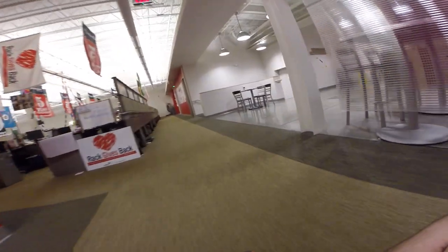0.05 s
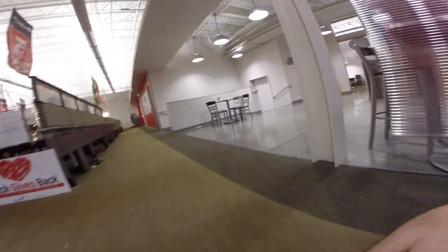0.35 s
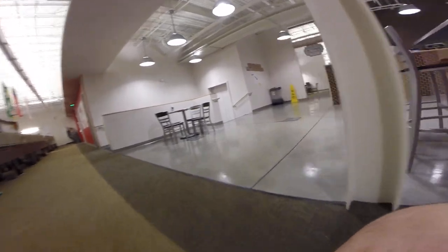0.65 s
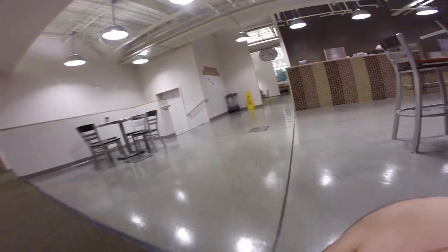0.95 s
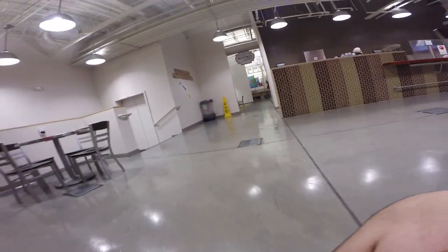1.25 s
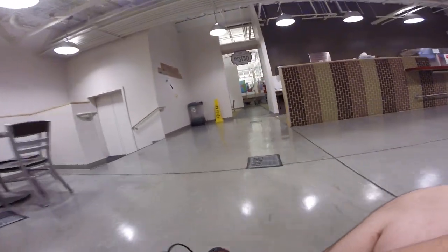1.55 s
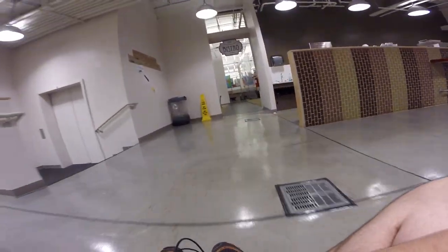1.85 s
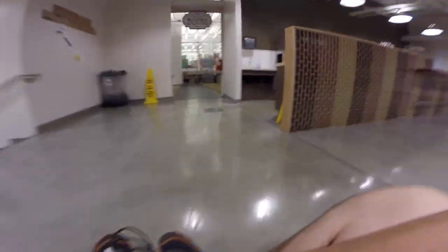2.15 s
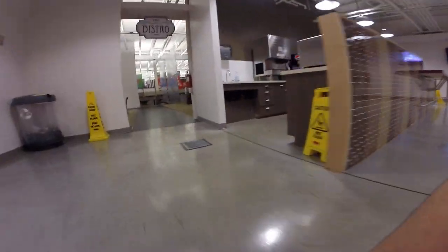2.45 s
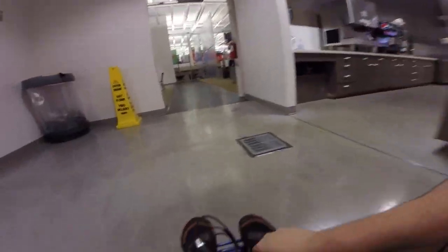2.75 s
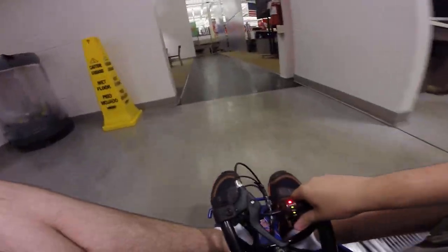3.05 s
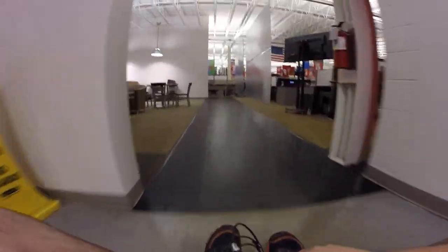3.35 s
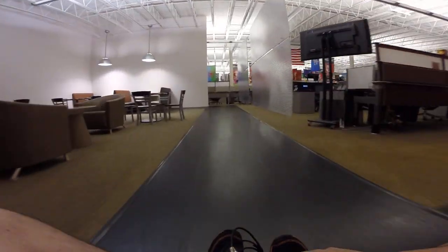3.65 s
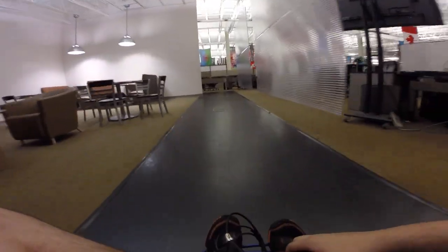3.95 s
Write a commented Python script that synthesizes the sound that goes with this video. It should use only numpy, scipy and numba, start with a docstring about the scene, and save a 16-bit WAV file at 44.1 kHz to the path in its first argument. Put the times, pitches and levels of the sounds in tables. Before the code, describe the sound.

Electric go-cart wheels rumble from carpet onto concrete, with drive hum and rattling bumps.

```python
"""A small electric go-cart, heard from its seat, rolls from carpet onto polished concrete and back.
Floor grain booms in the hard wheels, which throb as they turn; the drive hums and its chain whirrs.
Seams thump the wheels, knock the chassis and rattle the frame.
The hall adds a short tail; a limiter holds the peaks down."""
import sys
import numpy as np
from scipy import signal
from scipy.fft import rfft, irfft
from scipy.io import wavfile
from scipy.ndimage import uniform_filter1d, minimum_filter1d
from numba import njit

SR = 44100
rng = np.random.default_rng(int(sys.argv[2]) if len(sys.argv) > 2 else 0)


def wrap_up_sound(samples):
    """Save the sound to the file named by the first command line argument, as 16-bit audio."""
    columns = np.atleast_2d(samples).T
    # keep every value between -1 and 1, then stretch to whole-number steps
    tamed = np.clip(columns, -1, 1)
    steps = np.round(tamed * 32767).astype(np.int16)
    wavfile.write(sys.argv[1], SR, steps)


N = 4 * SR


def undb(db):
    """Decibels to gain."""
    return 10 ** (np.asarray(db) / 20)


def unit(x):
    """Scale to rms 1."""
    return x / np.sqrt(np.mean(x ** 2))


def curve(table, column=1):
    """One table column, linear in time."""
    rows = np.array(table, float)
    return np.interp(np.arange(N) / SR, rows[:, 0], rows[:, column])


def colour(x, spectrum):
    """Minimum-phase filter through (frequency [Hz], level [dB]) points; rms 1."""
    hz, db = np.array(spectrum, float).T
    bins_hz = np.maximum(np.arange(N // 2 + 1) * SR / N, 1)
    gain = undb(np.interp(np.log(bins_hz), np.log(hz), db))
    cepstrum = irfft(np.log(gain), N)
    cepstrum[1:N // 2] *= 2
    cepstrum[N // 2 + 1:] = 0
    return unit(irfft(rfft(x) * np.exp(rfft(cepstrum)), N))


@njit
def bandpass(x, hz, width_hz):
    """State-variable band-pass with a moving centre."""
    y, band_state, low_state = np.empty(len(x)), 0., 0.
    for i in range(len(x)):
        g, damping = np.tan(np.pi * hz[i] / SR), width_hz / hz[i]
        band = (band_state + g * (x[i] - low_state)) / (1 + g * (g + damping))
        band_state = 2 * band - band_state
        low_state += 2 * g * band
        y[i] = damping * band
    return y


def drift(rate_hz):
    """Smooth random drift; rms 1."""
    span = int(SR / rate_hz)
    return unit(uniform_filter1d(uniform_filter1d(rng.standard_normal(N), span), span))


def grains(per_s, spread_db):
    """Random tiny impacts of uneven size; rms 1."""
    size = undb(spread_db * np.clip(rng.standard_normal(N), -2, 2))
    sign = np.sign(rng.standard_normal(N))
    return unit(size * sign * (rng.random(N) < per_s / SR))


def burst(start_s, hold_s, rise_s, decay_s):
    """Rise, hold and exponential release."""
    t = np.arange(N) / SR - start_s
    return np.clip(t / rise_s + .5, 0, 1) * np.exp(-np.maximum(t - hold_s, 0) / decay_s)


def sine(hz):
    """Sine with a moving pitch."""
    return np.sin(2 * np.pi * np.cumsum(hz) / SR)


def hall(x, t60_s=0.56):
    """The hall returns a diffuse tail, mostly middle and treble."""
    tail = rng.standard_normal(N) * burst(0.0023, 0, rise_s=0.015, decay_s=t60_s / np.log(1000))
    wet = signal.fftconvolve(x, tail / np.sqrt(np.sum(tail ** 2)))[:N]
    return signal.sosfilt(signal.butter(2, [500, 6000], "band", fs=SR, output="sos"), wet)


# tread spectrum (frequency [Hz], level [dB])
HISS_SPECTRUM = [(3000, 11), (6000, 2), (7200, 1), (8400, 4.5), (10500, 0), (12200, 2.5), (14000, -19)]
# tread hiss (time [s], level [dB])
HISS_LEVEL = [(0, -56), (.18, -61), (.26, -37), (.45, -47), (.8, -43), (1.35, -49.5), (1.6, -50),
              (3.0, -46), (3.45, -47.5), (3.75, -62), (4, -73)]

def tread_hiss():
    """The tread brushes the floor in fine grains."""
    brush = colour(grains(per_s=2500, spread_db=2.5), HISS_SPECTRUM)
    return brush * undb(curve(HISS_LEVEL) + .9 * drift(30))


# ticks (time [s], level [dB])
TICKS = [(.598, -24), (2.096, -35.5), (3.894, -37.5)]
# tick spectrum (frequency [Hz], level [dB])
TICK_SPECTRUM = [(4000, -16), (5500, 2.5), (10000, -5)]

def ticks():
    """Loose parts give lone bright ticks."""
    envelope = sum(undb(db) * burst(s, 0, rise_s=.0004, decay_s=.0025) for s, db in TICKS)
    return envelope * colour(rng.standard_normal(N), TICK_SPECTRUM)


# low swells (time [s], hold [s], level [dB])
SWAYS = [(0.22, .08, -19), (3.869, 0.061, -25)]

def chassis_sway(bounce_hz=84.3):
    """The chassis bounces briefly on its tyres as they press into carpet."""
    push = sum(undb(db) * burst(s, hold, rise_s=.031, decay_s=.031) for s, hold, db in SWAYS)
    return push * sine(bounce_hz * (1 + 0.038 * drift(30)))


# frame modes (frequency [Hz], width [Hz], level [dB])
FRAME_MODES = [(1060, 100, 11.5), (1343, 38, 4.5), (1695, 28, 7), (3017, 41, 1.5), (3395, 44, 2),
               (5000, 100, -7.5), (5880, 60, -3.5)]

def frame_ring(x):
    """The tube frame rings in narrow modes."""
    return unit(sum(undb(db) * bandpass(x, np.full(N, float(hz)), float(width_hz))
                    for hz, width_hz, db in FRAME_MODES))


# chain whirr (time [s], level [dB])
CHAIN_LEVEL = [(0, -31), (.22, -32), (.5, -34.5), (1.35, -35), (1.65, -43), (2.2, -41.5), (3.0, -42),
               (3.45, -38.5), (3.75, -39.5), (4, -43)]
# link spectrum (frequency [Hz], level [dB])
CHAIN_SPECTRUM = [(600, 6), (1200, 13), (1700, 3), (2200, 1.5), (3000, 2.5), (3800, 2.5), (4500, -6),
                  (6000, -9.5), (7000, -28), (9000, -40), (15000, -65)]

def chain(drive_cycles, flicker_db=2.0, ring_db=-4):
    """Links tick over the sprocket and ring the frame."""
    pulse = 1 + 0.2 * np.sin(2 * np.pi * drive_cycles)
    links = grains(per_s=9000, spread_db=2) * pulse * undb(flicker_db * drift(21))
    ring = undb(ring_db) * frame_ring(rng.standard_normal(N))
    return (colour(links, CHAIN_SPECTRUM) + ring) * undb(curve(CHAIN_LEVEL))


# seam jolts (time [s], hold [s], rattle [dB], clink [dB])
JOLTS = [(0.033, 0.03, -21, -53), (0.199, 0.019, -18, -47), (1.072, 0.0098, -28, -31.5),
         (1.213, 0.011, -15, -27), (1.237, 0.022, -24, -30.5), (1.284, 0.0044, -32, -32),
         (1.461, 0.021, -26.5, -57), (1.477, 0.0084, -23, -35), (1.849, 0.019, -25, -50),
         (2.247, 0.025, -26.5, -68), (2.33, 0.011, -23.5, -47), (2.359, 0.013, -30, -44),
         (2.522, 0.044, -27.5, -47.5), (3.103, 0.025, -25, -46), (3.197, 0.032, -24.5, -46),
         (3.317, 0.015, -17.5, -32.5), (3.402, 0.014, -20.5, -36)]
# rattle and clink spectra (frequency [Hz], level [dB])
RATTLE_SPECTRUM = [(100, -29.5), (500, 4.5), (800, 4), (1100, -2.5), (1400, -5), (1700, -12), (2300, -17.5),
                   (3100, -12.5), (4700, -23), (8000, -46.5)]
CLINK_SPECTRUM = [(1000, -69), (3000, 7), (4700, -1), (6300, 1.5), (8500, -7), (12200, -6.5), (15000, -36)]

def seam_jolts(rise_s=0.0022, ring_db=-15.5, thud_db=-10):
    """Each seam thuds the wheels, shakes the frame and makes loose metal clink."""
    shake = sum(undb(db) * burst(s, hold, rise_s, decay_s=.012) for s, hold, db, _ in JOLTS)
    clink = sum(undb(db) * burst(s, hold, rise_s, decay_s=.0063) for s, hold, _, db in JOLTS)
    hits = grains(per_s=1500, spread_db=2.5)
    rattle = colour(hits, RATTLE_SPECTRUM)
    body = rattle + undb(ring_db) * frame_ring(hits) + undb(thud_db) * wheel_ring(hits)
    metal = colour(grains(per_s=1500, spread_db=2.5), CLINK_SPECTRUM)
    return shake * body + clink * metal


# knocks on seams (time [s], level [dB], focus [Hz])
KNOCKS = [(0.211, -15.5, 910), (1.078, -16.5, 950), (1.216, -14.5, 516.7), (1.241, -7.5, 1120),
          (1.255, -12.5, 1130), (1.287, -17, 521.6), (1.347, -16, 760), (1.463, -16.5, 585),
          (1.479, -11.5, 829), (1.488, -13.5, 1610), (2.333, -24, 744), (3.11, -20, 1120),
          (3.204, -16, 900), (3.32, -16, 1890), (3.327, -21, 2900), (3.404, -11.5, 870), (3.588, -20, 2880)]
# chassis modes (frequency [Hz], t60 [s], level [dB])
CHASSIS_MODES = [(185, 0.12, -5), (515.5, 0.07, 3.5), (850, 0.062, -7), (1027, 0.055, -7.5),
                 (1130, 0.056, -10.5), (1426, 0.04, -16.5), (1689, 0.067, -14.5), (1910, 0.042, -16.5),
                 (2940, 0.036, -18.5)]

def chassis_knocks(focus_db=6.5, focus_octaves=0.21, rise_s=0.0011, crack_db=-20, crack_decay_s=0.0028):
    """Each knock cracks and rings the chassis; where it lands decides which modes ring most."""
    out, t = np.zeros(N), np.arange(SR // 8) / SR
    scatter = rng.standard_normal((len(KNOCKS), len(CHASSIS_MODES), 2))
    for (start_s, db, focus_hz), mode_scatter in zip(KNOCKS, scatter):
        ring = 0
        for (hz, t60_s, mode_db), (detune, scatter_db) in zip(CHASSIS_MODES, mode_scatter):
            boost_db = focus_db * np.exp(-(np.log2(hz / focus_hz) / focus_octaves) ** 2)
            gain = np.sign(scatter_db) * undb(mode_db + boost_db + scatter_db)
            tone = np.sin(2 * np.pi * hz * (1 + 0.013 * detune) * t)
            ring = ring + gain * tone * undb(-60 * t / t60_s)
        crack = undb(crack_db) * rng.standard_normal(len(t)) * np.exp(-t / crack_decay_s)
        i = int(start_s * SR)
        out[i:i + len(t)] += undb(db) * (ring * np.minimum(t / rise_s, 1) + crack)
    return out


# drive pitch, following the speed (time [s], pitch [Hz])
DRIVE_PITCH = [(0, 229.7), (.22, 226.8), (.33, 231), (.43, 229.6), (.5, 233.6), (.62, 228.5), (.78, 238.2),
               (.85, 237), (.92, 241), (1.05, 235.4), (1.1, 227.6), (1.24, 222), (1.5, 233.6), (2.0, 244.8),
               (2.3, 252.2), (4, 246.5)]

def drive_phase():
    """Running cycle count of the slightly unsteady drive."""
    return np.cumsum(curve(DRIVE_PITCH) * (1 + 0.003 * drift(24))) / SR


# drive hum (time [s], level [dB])
HUM_LEVEL = [(0, -27), (.19, -25), (.25, -10.5), (.55, -13), (.68, -11), (.77, -13.5), (.95, -11),
             (1.06, -13), (1.085, -19), (1.195, -16.5), (1.22, -22.5), (2.25, -23.5), (2.5, -32)]
# hum partials (harmonic [number], level [dB])
HUM_PARTIALS = [(1, 0.5), (2, -15.5), (5, -29.5)]

def drive_hum(drive_cycles, flutter_db=0.6, jitter_rad=0.14):
    """The drive hums, strongest while pulling over the first carpet."""
    tone = 0
    for harmonic, db in HUM_PARTIALS:
        gain = undb(db + flutter_db * drift(22))
        phase = 2 * np.pi * drive_cycles + jitter_rad * drift(60)
        tone = tone + gain * np.sin(harmonic * phase)
    return unit(tone) * undb(curve(HUM_LEVEL))


# narrow wheel resonance (time [s], pitch [Hz], level [dB])
WHEEL_SING = [(.1, 428, -57), (.25, 428, -16), (.33, 408, -23.5), (.43, 413.3, -15), (.52, 440, -51),
              (.66, 464, -23.5), (.78, 474.5, -17), (.9, 478.5, -20.5), (.98, 477.5, -40), (1.1, 405, -16),
              (1.4, 419, -47)]

def wheel_sing(flutter_db=1.2):
    """The wheels sing in one wavering, nearly pure tone while the cart runs evenly."""
    hz = curve(WHEEL_SING) * (1 + 0.004 * drift(70))
    tone = unit(sine(hz) * undb(flutter_db * drift(33)))
    return tone * undb(curve(WHEEL_SING, column=2))


# wheel modes (frequency [ratio to wheel resonance], width [Hz], level [dB])
WHEEL_MODES = [(1.091, 73, -3), (0.889, 73, 0)]

def wheel_ring(x):
    """The hard wheels boom in two close resonances with steep skirts."""
    hz = curve(CONCRETE_ROLL, column=2)
    ring = 0
    for k, (ratio, width_hz, db) in enumerate(WHEEL_MODES):
        shifted = np.roll(x, k * SR // 7)  # decorrelates the modes
        mode = bandpass(shifted, ratio * hz, float(width_hz))
        ring = ring + undb(db) * bandpass(mode, ratio * hz, 2.8 * width_hz)
    return unit(ring)


# bumps in the concrete (time [s], hold [s], level [dB])
BUMPS = [(1.341, .02, -10.5), (1.377, 0.0095, -9), (1.582, 0.014, -8), (1.635, 0.019, -14),
         (1.709, .021, -9), (1.767, 0.016, -10.5), (1.853, 0.03, -10), (1.89, 0.012, -7),
         (1.984, 0.0069, -7), (2.117, 0.012, -7), (2.144, .016, -9), (2.256, 0.02, -11.5),
         (2.332, 0.021, -8.5), (2.362, 0.029, -9), (2.463, 0.018, -16.5), (2.507, 0.017, -14.5),
         (2.612, 0.0058, -8), (2.701, .03, -13), (2.818, 0.026, -15), (2.894, 0.022, -14),
         (2.973, 0.0079, -12.5), (3.085, 0.0058, -9), (3.142, 0.0047, -6), (3.174, 0.013, -12.5),
         (3.292, .012, -7.5), (3.581, .008, -10), (3.64, 0.0073, -12), (3.789, 0.0091, -14)]

def floor_bumps(thud_db=-13):
    """Each uneven patch swells the wheels' ring, at a wandering pitch, over a dull thud."""
    push = sum(undb(db) * burst(s, hold, rise_s=.00315, decay_s=.0049) for s, hold, db in BUMPS)
    hz = curve(CONCRETE_ROLL, column=2) * (1 + 0.0247 * drift(112.6))
    thud = colour(grains(GRAIN_PER_S, GRAIN_SPREAD_DB), CONCRETE_SPECTRUM)
    return push * (sine(hz) + undb(thud_db) * thud)


# rolling on carpet (time [s], level [dB])
CARPET_ROLL = [(0, -22.5), (.05, -20), (.11, -19), (.22, -16), (.35, -20), (1.05, -18.5), (1.4, -20),
               (1.6, -30.5), (3.7, -38), (3.8, -22), (3.9, -25.5), (4, -27.5)]
# rolling on concrete (time [s], level [dB], wheel resonance [Hz])
CONCRETE_ROLL = [(0, -56, 417), (1.0, -31, 464), (1.25, -23, 440), (1.45, -14.5, 455), (1.6, -22.5, 492),
                 (1.88, -21, 502), (2.03, -19.5, 475), (2.24, -17, 498), (2.305, -19.5, 460),
                 (2.35, -18.5, 445), (2.45, -18, 445), (2.62, -17, 464), (3.1, -16.5, 490),
                 (3.35, -19, 440), (3.56, -16.5, 487), (3.795, -16, 465), (3.82, -22.5, 450), (4, -55, 450)]
# floor spectra (frequency [Hz], level [dB])
CARPET_SPECTRUM = [(20, -19), (50, -14.5), (70, -5), (85, -1), (110, -13.5), (160, -12), (260, -5),
                   (320, -11), (420, -2), (560, -15.5), (780, -14.5), (900, -22), (1150, -29),
                   (1500, -33.5), (2300, -53), (6000, -53)]
CONCRETE_SPECTRUM = [(20, -18), (50, 2.5), (100, -14), (170, 3), (280, 7), (340, -3), (560, -2), (700, -9),
                     (900, -10), (1100, -17), (1400, -28), (2200, -32), (6000, -49.5)]
# out-of-round throb (rate [per turn], depth [dB])
THROB = [(1, 0.2), (3, 1.5), (4, 1.94)]
GRAIN_PER_S, GRAIN_SPREAD_DB = 900, 1

def rolling_wheels(drive_cycles, cycles_per_turn=31, roar_db=-5):
    """Carpet gives a soft rumble; concrete grain a boom and roar that throb with each wheel turn."""
    turns = drive_cycles / cycles_per_turn
    throb_db = sum(db * np.sin(2 * np.pi * (per_turn * turns + rng.random())) for per_turn, db in THROB)
    carpet = colour(grains(per_s=3000, spread_db=1.1), CARPET_SPECTRUM) * undb(curve(CARPET_ROLL))
    boom = wheel_ring(grains(GRAIN_PER_S, GRAIN_SPREAD_DB))
    roar = undb(roar_db) * colour(grains(GRAIN_PER_S, GRAIN_SPREAD_DB), CONCRETE_SPECTRUM)
    concrete = (boom + roar) * unit(undb(throb_db)) * undb(curve(CONCRETE_ROLL))
    return carpet + concrete


def scene():
    """The cart and the hall around it, mono."""
    cycles = drive_phase()
    running = drive_hum(cycles) + rolling_wheels(cycles) + wheel_sing() + chain(cycles) + tread_hiss()
    cart = running + seam_jolts() + chassis_knocks() + floor_bumps() + chassis_sway() + ticks()
    return (cart + undb(-8) * hall(cart))[None]


LIMIT_DB, LIMIT_SAMPLES, CUTOFF_HZ = -0.5, 300, 15300

def record(dry):
    """A fast limiter, then a steep low-pass."""
    needed_gain = np.minimum(1, undb(LIMIT_DB) / (np.abs(dry) + 1e-9))
    gain = uniform_filter1d(minimum_filter1d(needed_gain, LIMIT_SAMPLES), LIMIT_SAMPLES)
    return signal.sosfilt(signal.ellip(10, .2, 80, CUTOFF_HZ, fs=SR, output="sos"), dry * gain)


dry = scene()
out = record(dry)
wrap_up_sound(out)
```